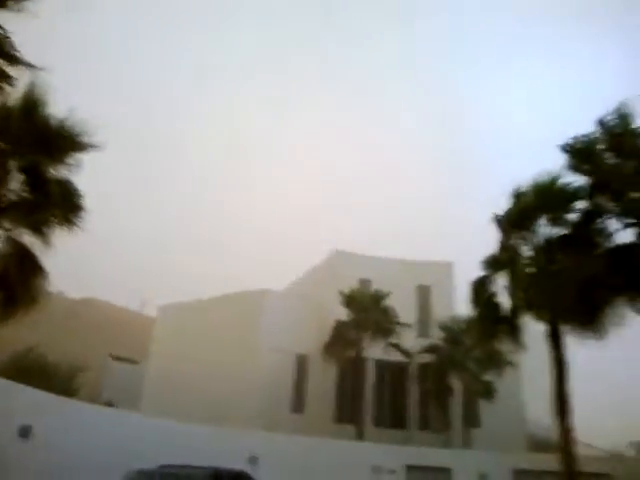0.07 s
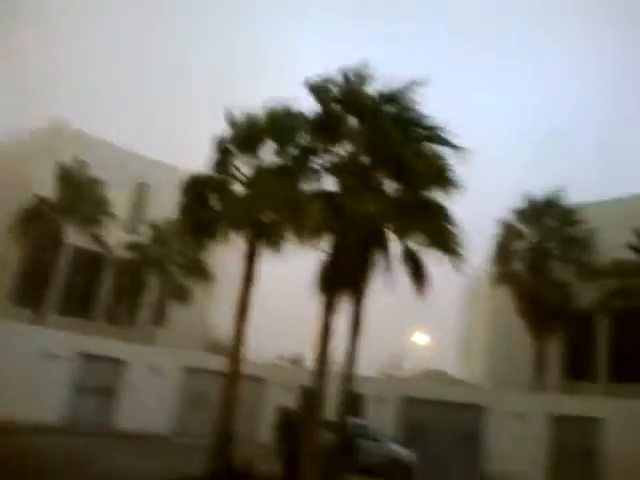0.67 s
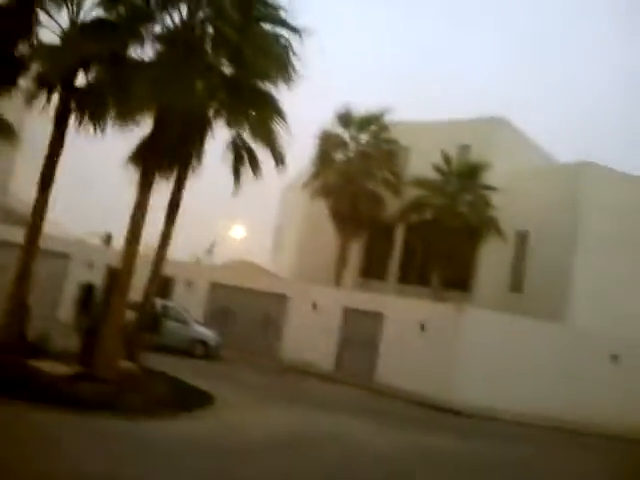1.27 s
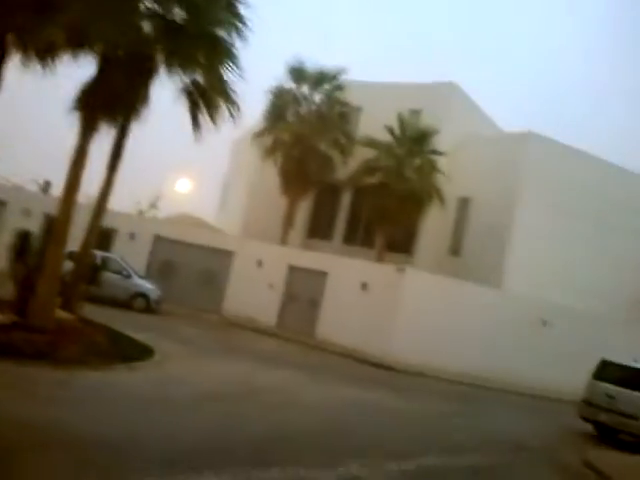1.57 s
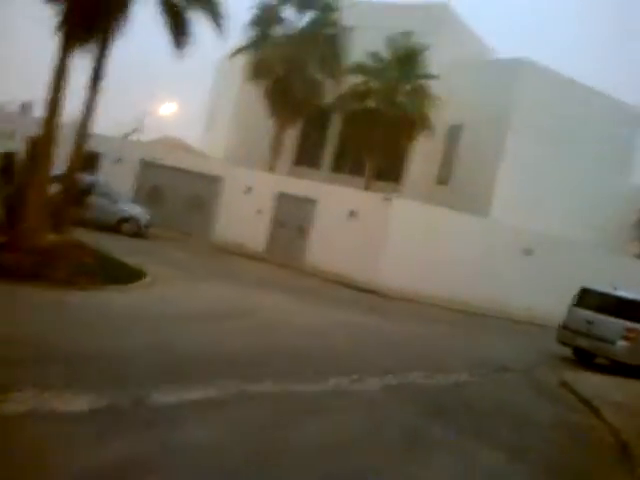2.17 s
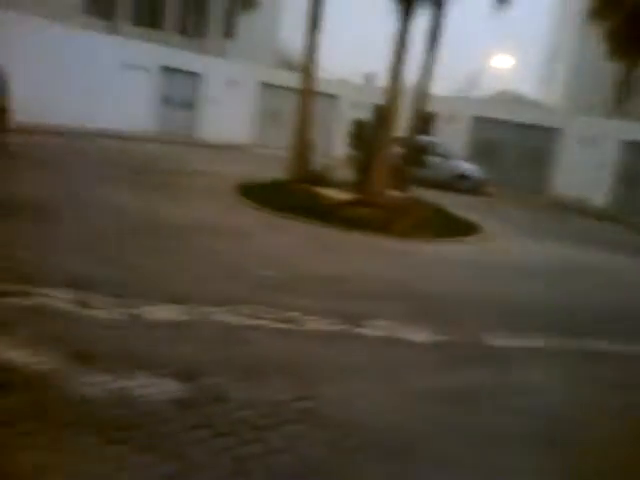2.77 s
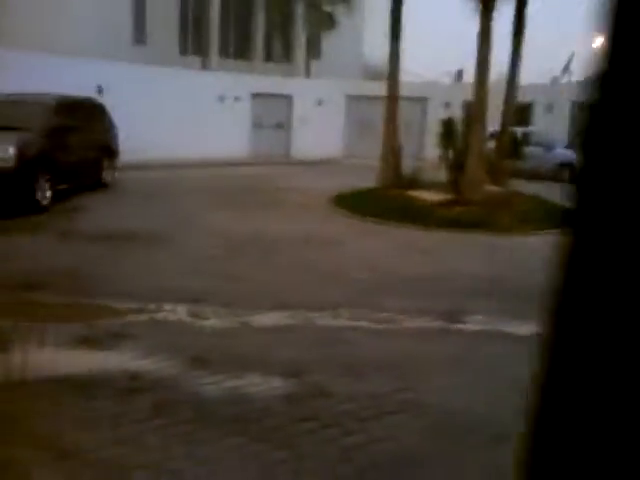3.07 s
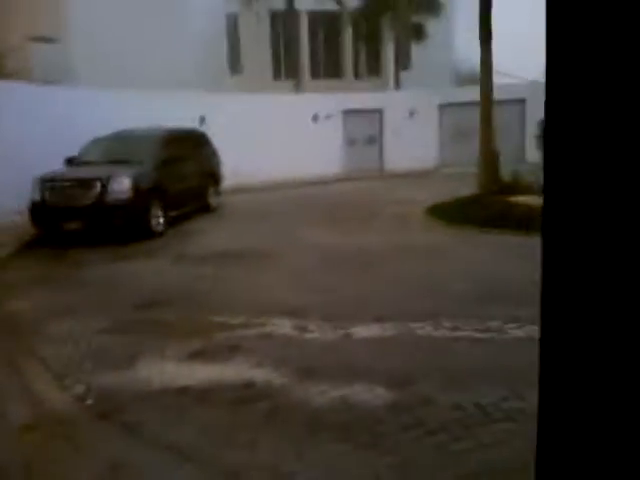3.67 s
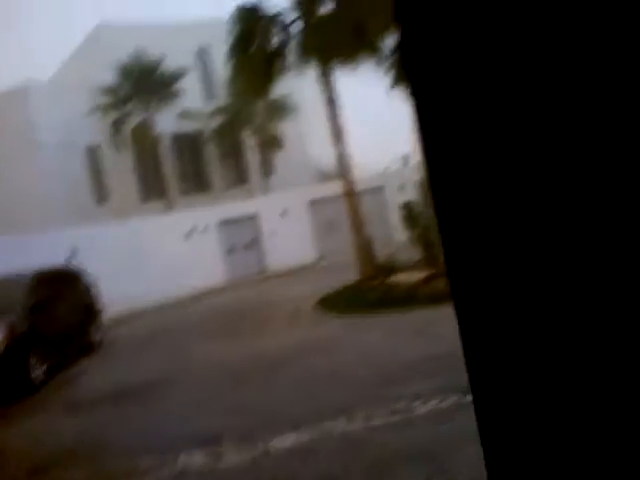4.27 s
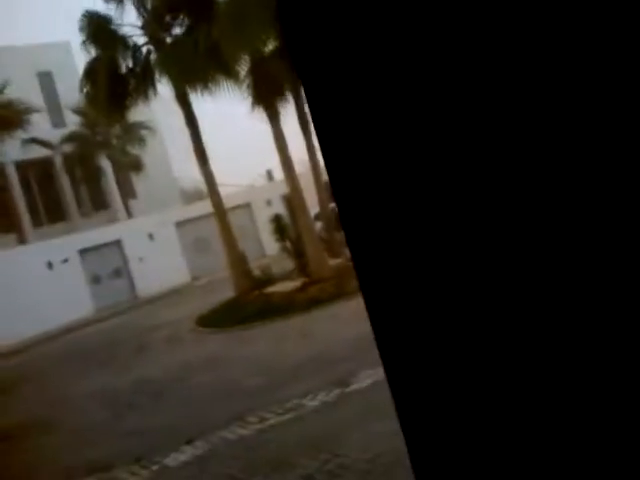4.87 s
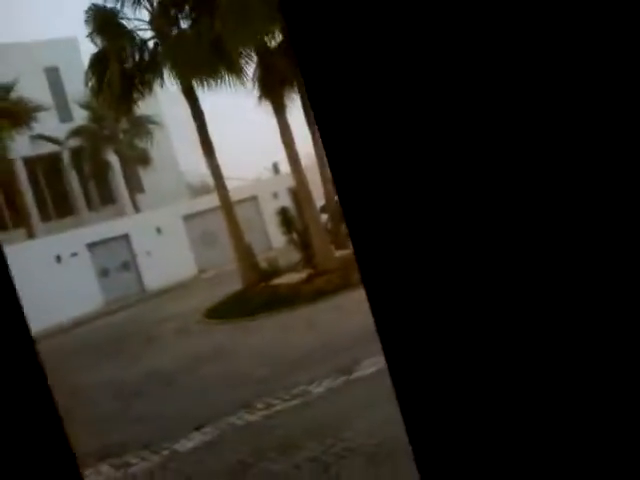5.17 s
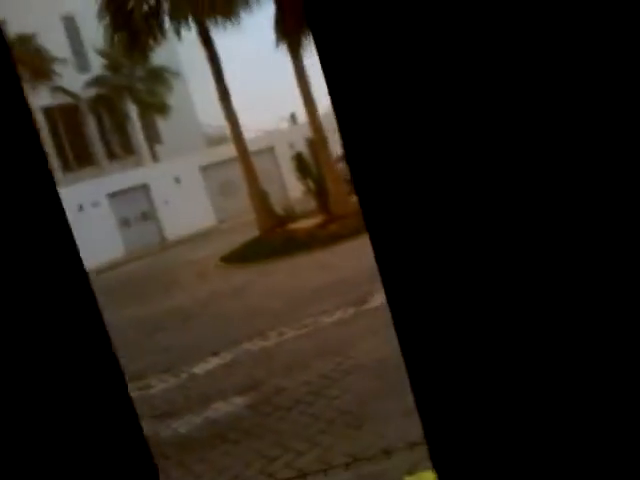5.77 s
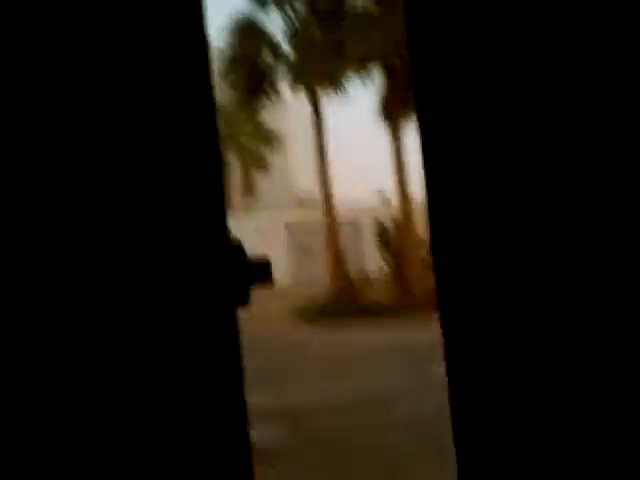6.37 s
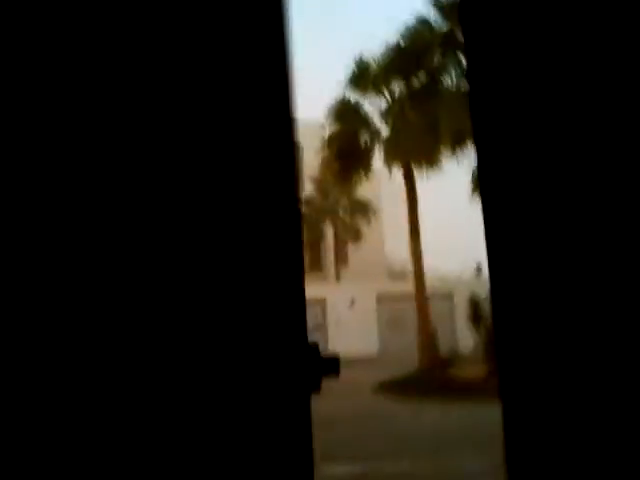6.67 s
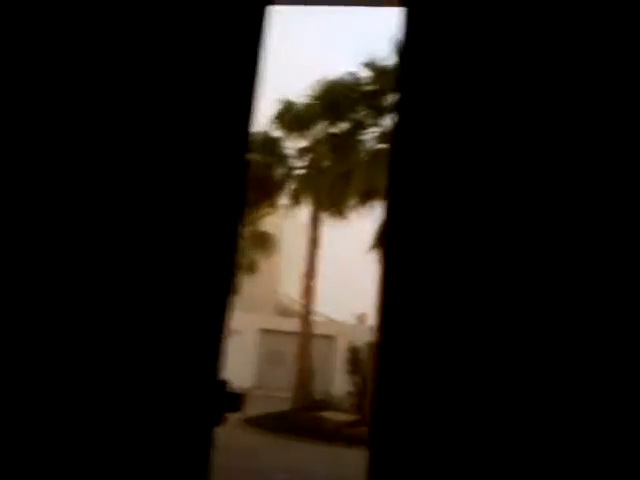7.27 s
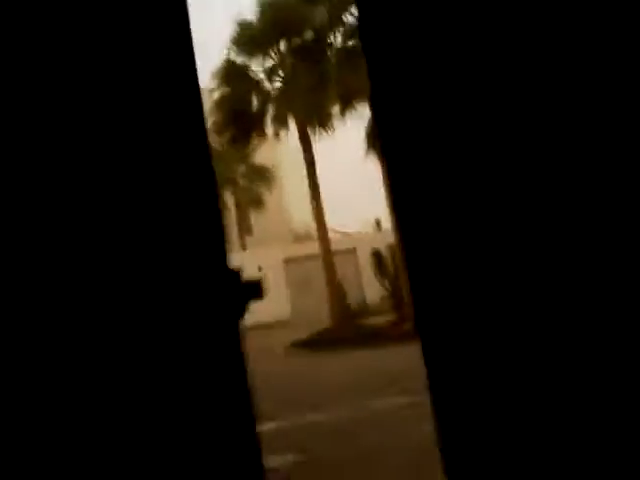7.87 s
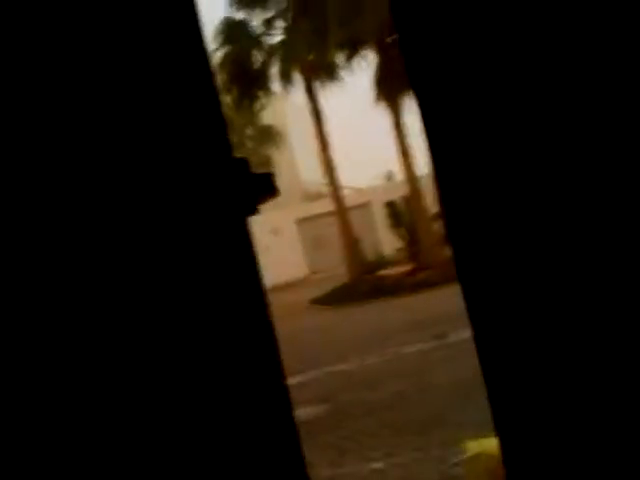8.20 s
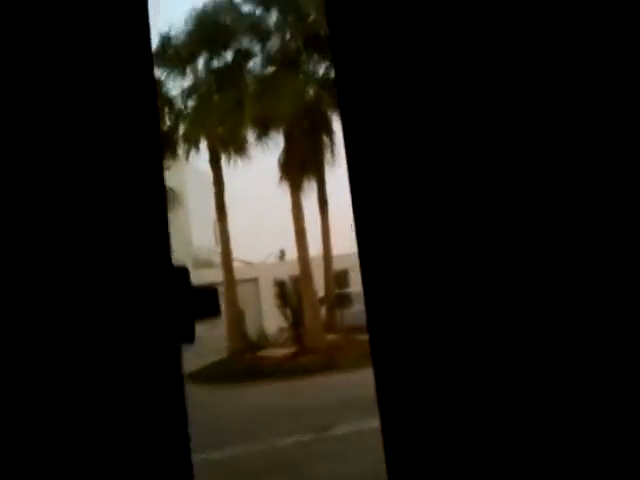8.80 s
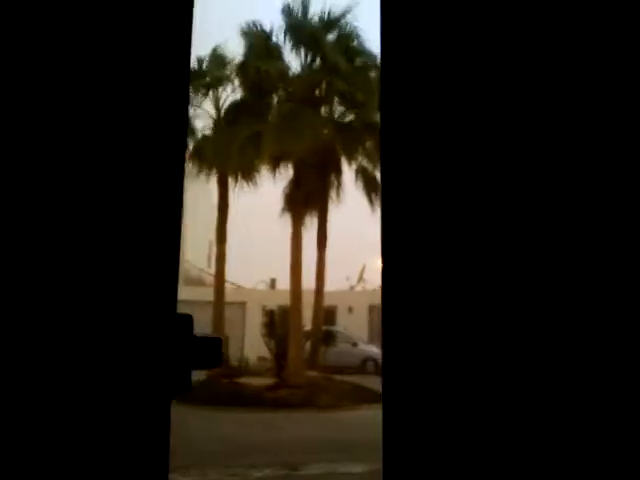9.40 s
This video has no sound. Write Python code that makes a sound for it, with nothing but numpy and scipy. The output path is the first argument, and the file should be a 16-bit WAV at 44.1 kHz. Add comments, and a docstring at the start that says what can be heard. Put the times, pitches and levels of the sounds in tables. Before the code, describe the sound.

Palm leaves hiss in rumbling gusts; a metal door rattles, then closes off the wind to a duller throb, with brief dropouts.

```python
"""Dust storm behind a metal door

Fan palms hiss and patter in the street, air rushes round the houses, and gusts buffet the microphone
of a hand-held phone. The metal door clanks, chatters and scrapes; as it is drawn to, the hiss dulls
and the doorway throbs. Handling makes small clicks, and the sound cuts out several times, with short
low thumps at and between some of the cuts."""
import sys
import numpy as np
from scipy import signal
from scipy.fft import rfft, irfft, next_fast_len
from scipy.io import wavfile
from scipy.ndimage import uniform_filter1d

SR = 44100
rng = np.random.default_rng(int(sys.argv[2]) if len(sys.argv) > 2 else 0)


def materialize(psi):
    """Save the field psi as 16-bit PCM at rate SR to the path in sys.argv[1].

    A 1-D psi becomes a single channel; in a 2-D psi each row is a channel.
    """
    bounded = np.clip(np.atleast_2d(psi).T, -1, 1)
    quanta = np.round(bounded * 32767).astype(np.int16)
    wavfile.write(sys.argv[1], SR, quanta)


N = 425124
TIME = np.arange(N) / SR


def undb(db):
    """Decibels to gain."""
    return 10 ** (np.asarray(db) / 20)


def unit(x):
    """Scale to rms 1."""
    return x / np.sqrt(np.mean(x ** 2))


def automation(points):
    """Straight ramps through (time [s], value) points, one value a sample."""
    return np.interp(TIME, *np.transpose(points))


def noise():
    """White noise."""
    return rng.standard_normal(N)


def colour(x, points):
    """EQ x through (frequency [Hz], gain [dB]) points, 20 dB an octave down beyond the ends; rms 1."""
    size = next_fast_len(N)
    octave = np.log2(np.maximum(np.fft.rfftfreq(size, 1 / SR), 1))
    hz, db = np.transpose(points)
    octaves_outside = np.abs(octave - np.clip(octave, np.log2(hz[0]), np.log2(hz[-1])))
    gain = undb(np.interp(octave, np.log2(hz), db) - 20 * octaves_outside)
    return unit(irfft(rfft(x, size) * gain, size)[:N])


def wander(rate):
    """A smooth random modulator that changes rate times a second; rms 1."""
    hold = int(SR / rate)
    steps = noise()[np.arange(N) // hold]
    return unit(uniform_filter1d(uniform_filter1d(steps, hold), hold))


def waver(depth_db, rate):
    """A gain that wanders by depth_db rms, rate times a second."""
    return undb(depth_db * wander(rate))


def grains(rate, spread_db):
    """Tiny impacts of uneven size, rate a second; rms 1."""
    hits = rng.random(N) < rate / SR
    return unit(hits * noise() * undb(spread_db * np.minimum(rng.exponential(size=N), 4)))


def level_out(x, seconds):
    """Ride the gain to take the slow swells out of a noise."""
    return x / np.sqrt(uniform_filter1d(x ** 2, int(seconds * SR)) + 1e-9)


def fade(start, decay):
    """An envelope with an instant attack and an exponential tail."""
    age = TIME - start
    return (age >= 0) * np.exp(-np.clip(age / decay, 0, 50))


# the door closing off the wind: (time [s], shelter [0 open to 1 shut])
DOOR_CLOSING = [(2.9, 0), (3.3, 0.27), (4.0, 0.93), (4.7, 0.99)]


def shelter():
    """How far the door has closed, 0-1."""
    return np.clip(automation(DOOR_CLOSING), 0, 1)


def door_crossfade(exposed, sheltered):
    """Equal-power crossfade from the open-door sound to the sheltered one as the door closes."""
    return np.sqrt(1 - shelter()) * exposed + np.sqrt(shelter()) * sheltered


# the wind's strength, heard as frond hiss: (time [s], level [dB])
WIND_LEVEL = [(0.0, -42), (0.25, -41), (0.9, -43), (1.25, -45.5), (2.45, -46.5), (3.25, -45.6), (4.1, -51),
              (4.55, -52.5), (5.1, -55.5), (5.7, -55.5), (6.33, -53.5), (6.75, -53.5), (7.2, -55),
              (8.0, -55), (8.3, -52), (9.0, -56), (9.64, -52)]
# bright fronds through the open door: (frequency [Hz], gain [dB])
FRONDS_OPEN_EQ = [(1060, -33.5), (1800, -16), (2610, -5), (5810, 1.5), (15100, -25.5), (15800, -29)]
# duller fronds from behind the door: (frequency [Hz], gain [dB])
FRONDS_SHELTERED_EQ = [(1060, -10.5), (1800, -3.5), (1880, -5.5), (2220, -5), (2910, -8), (4080, -4),
                       (5170, -3.5), (7230, -13), (9240, -14.5), (11200, -22), (15100, -27.5), (15800, -28)]


def fronds(wind_db):
    """Countless leaf tips brush and tap, crowns swell in turn; the closing door dulls the hiss."""
    crowns = sum(colour(noise(), [(hz / 1.8, -14), (hz, 0), (hz * 1.5, -14)]) * waver(3.74, rate=7)
                 for hz in (3600, 5200, 6400))
    exposed = noise() * waver(0.5, rate=22) + 0.39 * grains(rate=2500, spread_db=4) + undb(-18.5) * crowns
    sheltered = noise() + 0.43 * grains(rate=1500, spread_db=4) + undb(-11.5) * crowns
    hiss = door_crossfade(colour(exposed, FRONDS_OPEN_EQ), colour(sheltered, FRONDS_SHELTERED_EQ))
    return hiss * undb(wind_db)


# the midrange body of the wind: (frequency [Hz], gain [dB])
RUSH_EQ = [(150, -1), (300, 1), (400, 1.5), (520, -2), (650, -2), (900, -2.5), (1350, -6), (1900, -6),
           (2600, -10.5), (4000, -23.5)]
RUSH_DB, BREEZE_DB, RUSH_SLOPE = -55.5, -50, 0.81  # RUSH_DB with the wind at BREEZE_DB; dB per dB of wind


def air_rush(wind_db):
    """Air rushes round the houses, riding the wind; narrow bands swell and sink on their own."""
    air = colour(noise(), RUSH_EQ)
    swirl = sum(colour(noise(), [(hz / 1.15, -18), (hz, 0), (hz * 1.15, -18)]) * waver(2.3, rate=6)
                for hz in (378.6, 650, 814, 1095, 1980))
    rush_db = RUSH_DB + RUSH_SLOPE * (wind_db - BREEZE_DB)
    return (air + undb(-19.5) * swirl) * undb(rush_db)


# gusts on the microphone: (peak time [s], length [s], large eddy drive [dB], small eddy drive [dB])
GUST_SWELLS = [(0.19, 0.1, -34, -43), (0.463, 0.17, -42, -38.5), (0.61, .07, -33.5, -41),
               (0.75, 0.13, -42, -46), (0.979, 0.087, -36, -36.5), (1.228, 0.13, -29, -32.5),
               (1.394, 0.13, -32, -30), (1.566, .13, -32, -32), (1.85, 0.28, -41, -38),
               (2.191, 0.074, -35, -31.5), (2.342, .12, -36, -36.5), (2.57, 0.18, -38.5, -38),
               (2.843, 0.18, -32, -32), (3.134, 0.23, -33, -41.5), (3.406, 0.048, -29, -35),
               (3.684, 0.33, -44.5, -47.5), (4.062, 0.18, -41, -42.5), (4.3, 0.17, -37, -45.5),
               (4.51, 0.15, -47.5, -55), (5.02, 0.14, -45, -61), (5.188, 0.15, -41.5, -53),
               (5.46, .18, -41.5, -59), (5.962, 0.2, -36.5, -53), (6.415, 0.49, -47.5, -55.5),
               (7.106, 0.083, -53, -58), (8.25, 0.19, -44.5, -56), (8.502, 0.13, -47, -53.5),
               (8.776, 0.22, -37.5, -55), (8.996, 0.098, -42.5, -52), (9.265, 0.29, -43.5, -60)]
GUST_SQUARENESS = 1.9  # 2 is a bell, more is a flatter top with steeper sides
DRAUGHT_OPEN_DB, DRAUGHT_SHELTERED_DB = (-48.5, -52.5), (-50.5, -61)  # each for (large, small) eddies


def gusts():
    """Envelopes of the large and small eddies: gusts swell over a draught that the door weakens."""
    draught_db = np.outer(DRAUGHT_OPEN_DB, 1 - shelter()) + np.outer(DRAUGHT_SHELTERED_DB, shelter())
    power = undb(draught_db) ** 2
    for time, length, large_db, small_db in GUST_SWELLS:
        swell = np.exp(-np.minimum(np.abs(2 * (TIME - time) / length) ** GUST_SQUARENESS, 50))
        power += np.outer(undb([large_db, small_db]) ** 2, swell)
    return np.sqrt(power)


# sub rumble of the large eddies: (frequency [Hz], gain [dB])
RUMBLE_EQ = [(12, -16), (22, -6.5), (32, 3.5), (48, -4), (65, -7), (100, -30.5)]
# bass flutter of the small eddies, door open: (frequency [Hz], gain [dB])
FLUTTER_OPEN_EQ = [(40, -16.5), (62, -2), (80, 2), (120, -5), (190, -13.5), (280, -20.5), (600, -34),
                   (1500, -59)]
# their flutter behind the door: (frequency [Hz], gain [dB])
FLUTTER_SHELTERED_EQ = [(45, -9.5), (75, 3.5), (115, 1.5), (170, -6), (240, -8), (400, -27.5), (1000, -35)]
THROB_HZ, THROB_WANDER, THROB_DB = 34, 0.1712, -3  # pitch, its rms drift as a fraction, mix level


def buffeting():
    """Eddies rumble on the microphone in puffs; behind the door they also set the doorway throbbing."""
    large_eddies, small_eddies = gusts()
    rumble = level_out(colour(noise(), RUMBLE_EQ), seconds=0.11) * undb(-2 * shelter())
    throb_hz = THROB_HZ * (1 + THROB_WANDER * wander(rate=14))
    throb = shelter() * undb(THROB_DB) * unit(np.sin(2 * np.pi * np.cumsum(throb_hz) / SR))
    exposed = level_out(colour(noise() * waver(4, rate=45), FLUTTER_OPEN_EQ), seconds=0.08)
    sheltered = level_out(colour(noise() * waver(5.4, rate=45), FLUTTER_SHELTERED_EQ), seconds=0.08)
    flutter = door_crossfade(exposed, sheltered)
    puffs = unit(waver(2.5, rate=16))
    return large_eddies * (rumble + throb) + small_eddies * flutter * puffs


# ticks and creaks of the grip: (time [s], level [dB], centre [Hz], bandwidth [Hz], decay [s])
HANDLING_CLICKS = [(.459, -47, 10900, 7000, .004), (.996, -40, 8000, 6000, 0.0035),
                   (4.091, -37, 6400, 5000, 0.0038), (4.466, -42, 7000, 5000, 0.0022),
                   (4.482, -43, 5500, 4000, 0.0023), (4.585, -50, 5460, 2000, .008),
                   (4.657, -52, 10000, 3000, .004), (4.929, -39.5, 4630, 1080, 0.0037),
                   (5.031, -48.5, 5300, 2524, 0.0046), (5.324, -37.5, 3680, 1100, 0.0039),
                   (5.335, -46.5, 4000, 1400, 0.02), (6.302, -51, 5450, 2500, 0.02),
                   (8.209, -50, 1950, 150.3, 0.029), (8.456, -52, 2270, 78.7, .016)]


def handling_clicks():
    """Short dry ticks and creaks of the hand on the phone, each a noise burst in one resonance."""
    out = np.zeros(N)
    for time, db, hz, bandwidth, decay in HANDLING_CLICKS:
        resonance = signal.iirpeak(hz, hz / bandwidth, fs=SR)
        out += undb(db) * fade(time, decay) * unit(signal.lfilter(*resonance, noise()))
    return out


# wind pops on the microphone: (time [s], peak level [dB], length [s])
EDDY_SLAPS = [(0.46, -24.5, 0.0073), (0.995, -24.5, 0.013), (1.214, -16, 0.0097), (1.365, -13.5, 0.0079),
              (1.436, -17, 0.0071), (1.582, -27, 0.0054), (2.803, -19, 0.014), (2.887, -23.5, 0.013),
              (2.916, -20, 0.016), (3.426, -25.5, 0.0068), (4.051, -25, 0.0071), (4.097, -25.5, 0.0071)]


def eddy_slaps():
    """The strongest eddies strike singly: a pressure peak with suction on either side."""
    out = np.zeros(N)
    for time, db, length in EDDY_SLAPS:
        offset = (TIME - time) / (length / 2)
        near = np.abs(offset) < 5
        out[near] += undb(db) * (1 - offset[near] ** 2) * np.exp(-offset[near] ** 2 / 1.3)
    return out


# modes of the metal door: (frequency [Hz], gain [dB], free ring time to -60 dB [s])
DOOR_MODES = [(318, 0, .85), (458, -8, .6), (639, -1, .6), (765, -13, .55), (912, -14, .6), (938, -7, .5),
              (1050, -15, .3), (1208, -12, .35), (1262, -13, .25), (1371, -13, .4), (1482, -12, .4),
              (1534, -11, .4), (1591, -14, .3), (1725, -12, .55), (1825, -15, .35), (1890, -15, .3),
              (2085, -18, .3), (2405, -18, .2)]


def door_ring(force, damping=1):
    """The panel's modes ring in answer to a force; damping above 1 chokes them, as contact does."""
    out = np.zeros(N)
    for hz, db, t60 in DOOR_MODES:
        radius = np.exp(-np.log(1000) * damping / (t60 * SR))
        angle = 2 * np.pi * hz / SR
        resonator = [0, radius * np.sin(angle)], [1, -2 * radius * np.cos(angle), radius ** 2]
        out += undb(db) * signal.lfilter(*resonator, force + 1e-18)
    return out


# the door dragging: (peak time [s], length [s], grind [dB], ring drive [dB], hiss [dB])
DOOR_SCRAPES = [(0.598, 0.037, -44.5, -69, -41), (2.191, 0.0073, -42, -43, -58),
                (2.225, 0.037, -31.5, -32.5, -58), (2.312, 0.16, -47.5, -46, -60),
                (5.737, 0.031, -55.5, -81, -58), (5.784, 0.038, -60, -58, -54.5),
                (5.835, 0.025, -54, -53, -70), (9.318, 0.029, -74, -78, -48), (9.383, 0.042, -58, -77, -45),
                (9.61, 0.17, -48, -65, -49)]
# the gritty body of a scrape: (frequency [Hz], gain [dB])
GRIND_EQ = [(200, 1), (450, 1.5), (800, 3.5), (1500, 6), (2500, 2.5), (3300, -11.5), (6000, -27),
            (12000, -42)]
# its hissing top: (frequency [Hz], gain [dB])
SCRAPE_HISS_EQ = [(1200, -24), (2500, -1.5), (5000, 1.5), (8000, -7), (12000, -16), (15500, -27)]


def door_scrapes():
    """Metal drags on metal: dense slips grind, hiss and set the panel ringing."""
    grind, drive, hiss = np.zeros((3, N))
    for time, length, grind_db, drive_db, hiss_db in DOOR_SCRAPES:
        push = np.exp(-np.minimum((2 * (TIME - time) / length) ** 2 / 2, 50))
        grind += push * undb(grind_db)
        drive += push * undb(drive_db)
        hiss += push * undb(hiss_db)
    slips = unit(noise() * waver(2.2, rate=300))  # the contact grips and lets go
    # the slips are short, so they reach the high modes best
    force = colour(slips, [(300, -11.5), (650, -14.5), (1000, -13.5), (1650, -8), (2500, -0.5)])
    ring = undb(-34.5) * door_ring(drive * force, damping=2.07)
    return grind * colour(slips, GRIND_EQ) + hiss * colour(noise(), SCRAPE_HISS_EQ) + ring


# blows on the door: (time [s], ring [dB], clatter [dB], crack [dB])
DOOR_BLOWS = [(1.687, -49.5, -30, -39), (1.697, -34, -25, -28), (1.7044, -32, -26, -23.5),
              (1.715, -46, -30.5, -38), (1.822, -51.5, -47.5, -32.5), (1.924, -43, -40.5, -36)]
# the rattling tail of a blow: (frequency [Hz], gain [dB])
CLATTER_EQ = [(120, -23), (300, 4.5), (450, 6), (700, 2), (1300, -3), (2200, -7), (3500, -11.5),
              (6000, -24.5), (9000, -34), (15000, -52)]
# its sharp attack: (frequency [Hz], gain [dB])
CRACK_EQ = [(250, -13), (440, 9.5), (650, 5), (1000, 9.5), (3000, -6), (6000, 6), (7500, -13), (10000, -29),
            (15000, -42.5)]


def door_clanks():
    """The door strikes and rattles: each blow cracks, stirs a dense clatter and rings the panel."""
    force, clatter_power, crack_power = np.zeros((3, N))
    for time, ring_db, clatter_db, crack_db in DOOR_BLOWS + door_chatter(count=5):
        force[int(time * SR)] += undb(ring_db)
        clatter_power += (undb(clatter_db) * fade(time, decay=0.041)) ** 2
        crack_power += (undb(crack_db) * fade(time, decay=0.0084)) ** 2
    clatter = np.sqrt(clatter_power) * colour(noise(), CLATTER_EQ)
    crack = np.sqrt(crack_power) * colour(noise(), CRACK_EQ)
    return door_ring(force) + clatter + crack


CHATTER_START_S, CHATTER_GAP_S = 1.7227, 0.0063
CHATTER_DB, CHATTER_LOSS_DB = (-33, -29, -34), 3  # first rebound (ring, clatter, crack); loss per bounce


def door_chatter(count):
    """After the hardest blow the door rebounds on its frame: evenly spaced blows, each one weaker."""
    return [(CHATTER_START_S + k * CHATTER_GAP_S, *(np.array(CHATTER_DB) - k * CHATTER_LOSS_DB))
            for k in range(count)]


# short low thumps, several where the sound cuts out or comes back: (time [s], level [dB])
LOW_THUMPS = [(5.872, -31), (6.011, -35.5), (6.141, -37.5), (6.2, -35.5), (6.361, -33.5), (6.42, -34),
              (6.642, -44), (7.082, -38), (7.222, -33), (7.531, -37), (8.193, -36), (8.211, -34),
              (8.653, -34)]


def low_thumps():
    """Each thump is a quick step that leaks away."""
    return sum(undb(db) * (fade(time, decay=0.0036) - fade(time, decay=0.00008))
               for time, db in LOW_THUMPS)


def scene():
    """Wind, door, handling clicks and thumps, mixed in mono."""
    wind_db = automation(WIND_LEVEL)
    wind = fronds(wind_db) + air_rush(wind_db) + buffeting() + eddy_slaps()
    door = door_scrapes() + door_clanks()
    return (wind + door + handling_clicks() + low_thumps())[None]


# hard cuts to silence: (start [s], end [s])
MUTES = [(1.825, 1.924), (1.948, 2.1275), (5.9125, 6.012), (6.755, 6.8556), (6.879, 7.069),
         (7.2315, 7.5214), (7.5445, 7.685), (7.824, 8.004), (8.655, 8.8038)]
HIGH_CUT_HZ = 15900


def record(dry):
    """The sound drops to silence now and then, and a steep low-pass takes off the very top."""
    gate = np.ones(N)
    for start, end in MUTES:
        gate[int(start * SR):int(end * SR)] = 0
    high_cut = signal.ellip(10, 0.1, 70, HIGH_CUT_HZ, fs=SR, output="sos")
    return signal.sosfilt(high_cut, dry * gate)


dry = scene()
out = record(dry)
materialize(out)
```